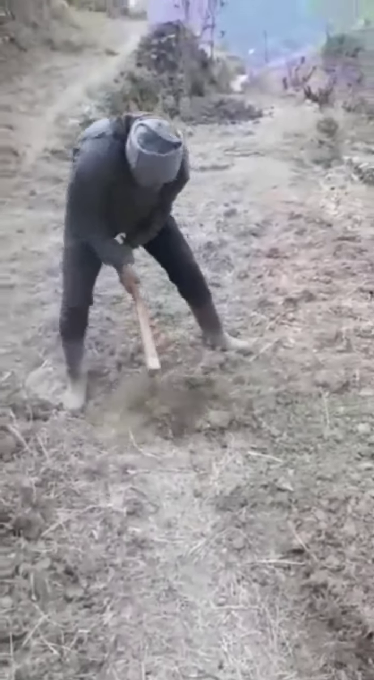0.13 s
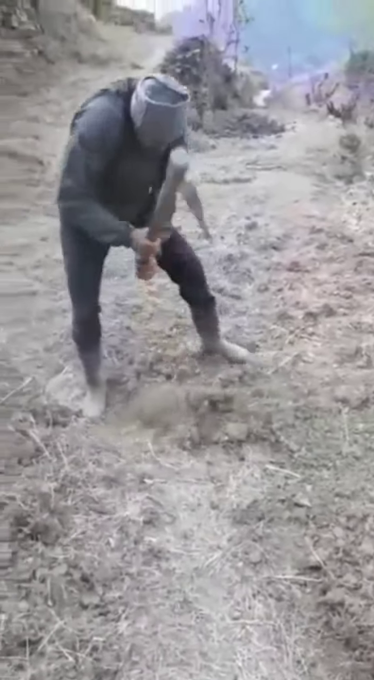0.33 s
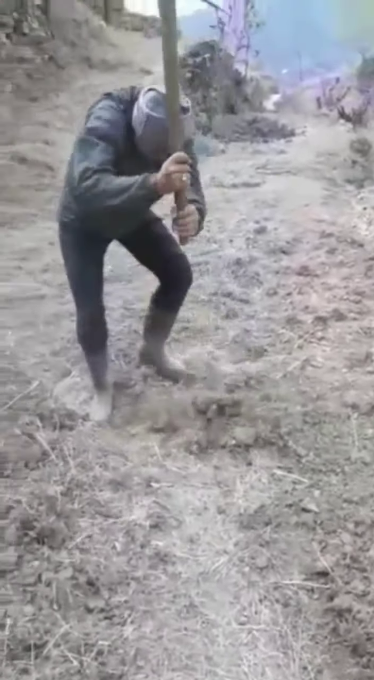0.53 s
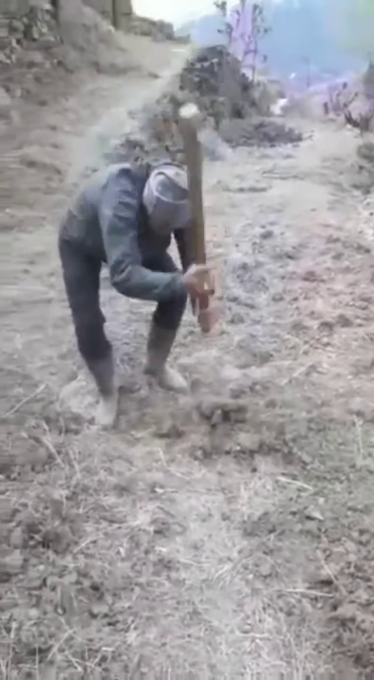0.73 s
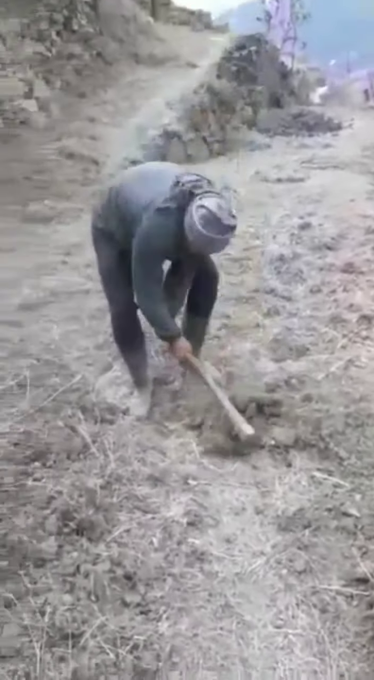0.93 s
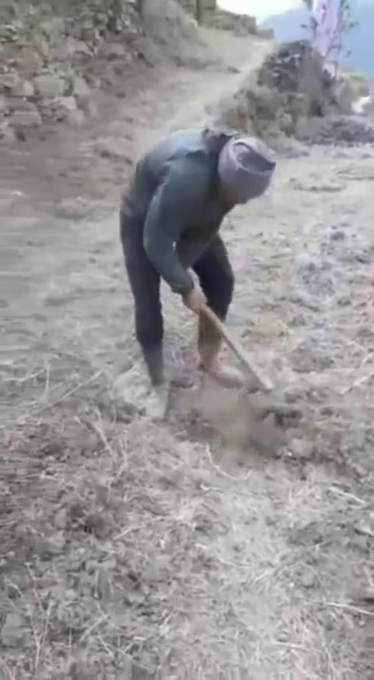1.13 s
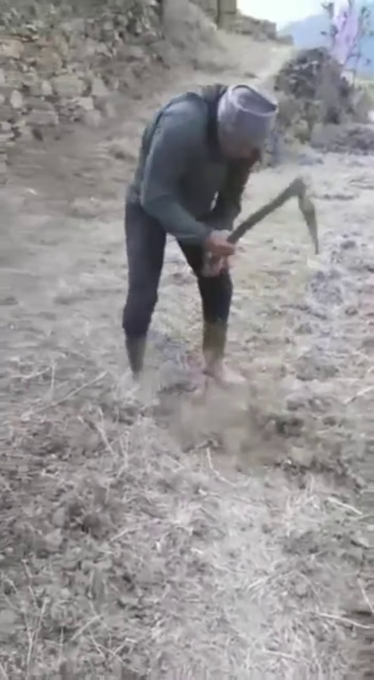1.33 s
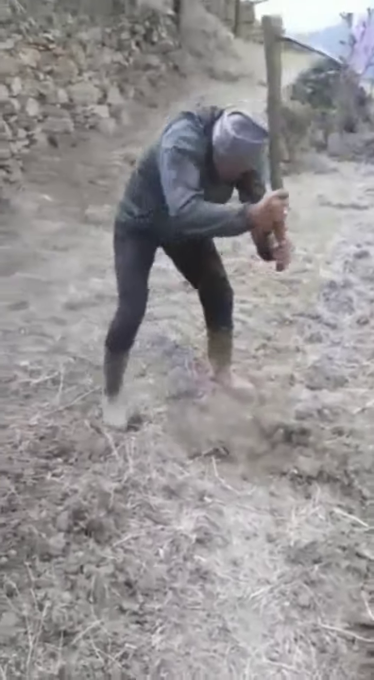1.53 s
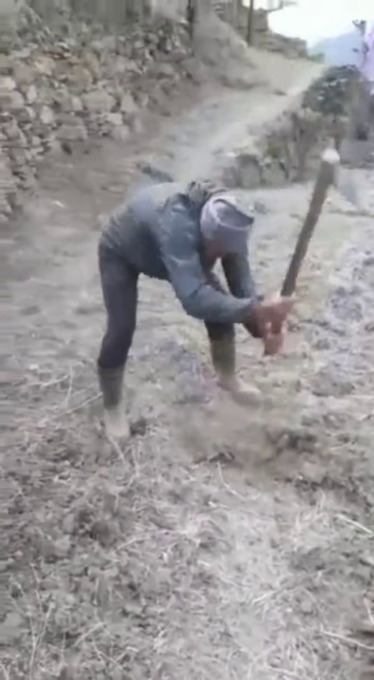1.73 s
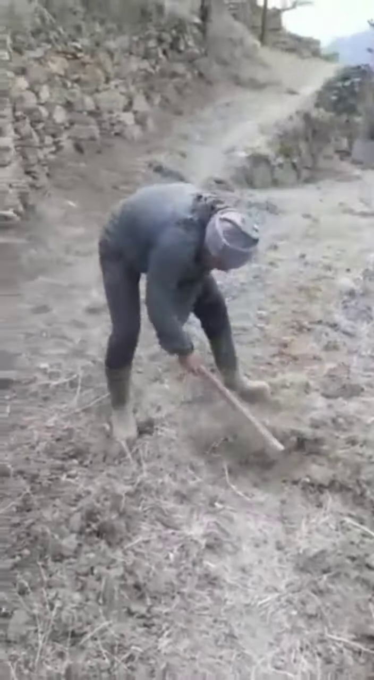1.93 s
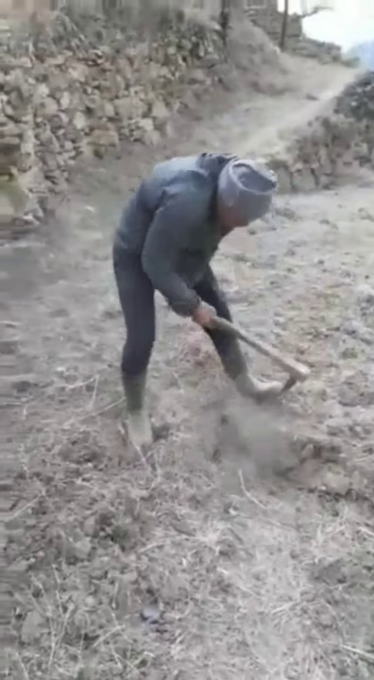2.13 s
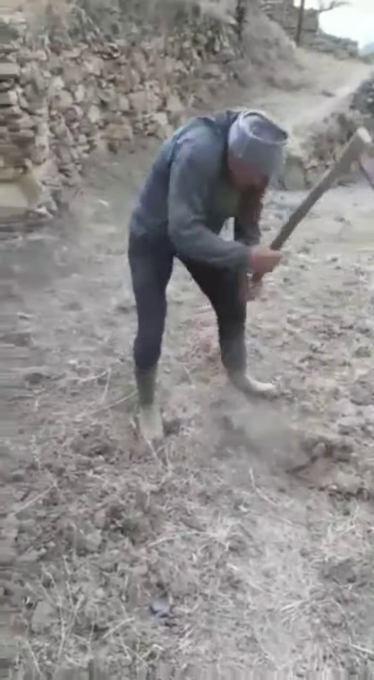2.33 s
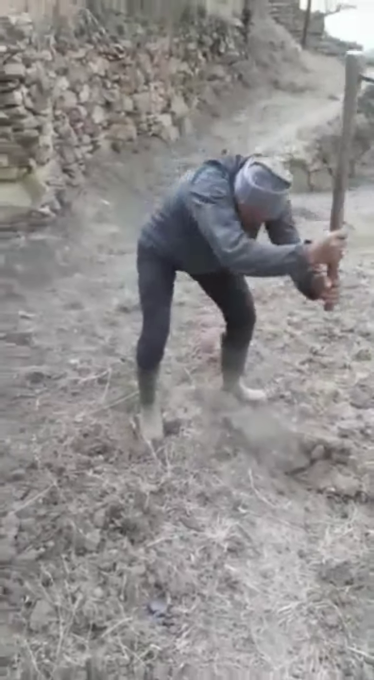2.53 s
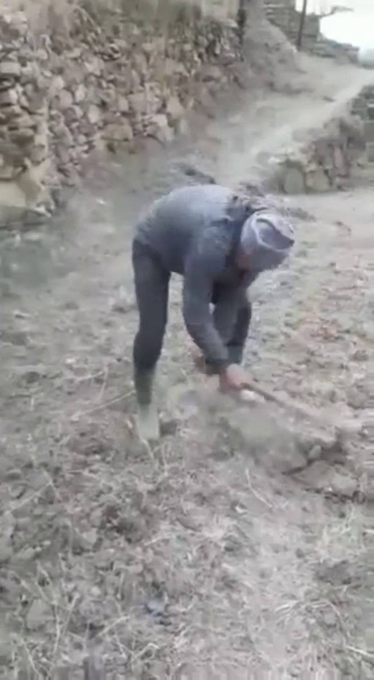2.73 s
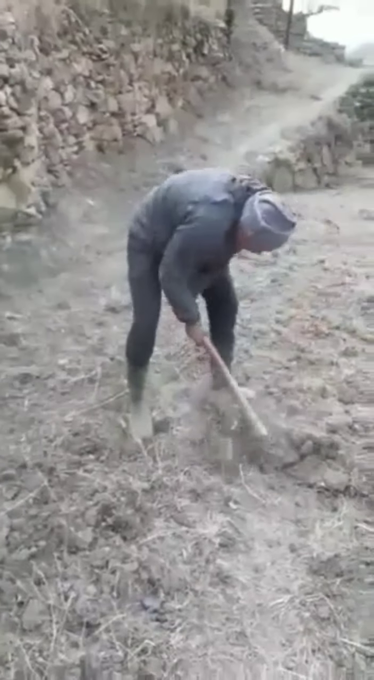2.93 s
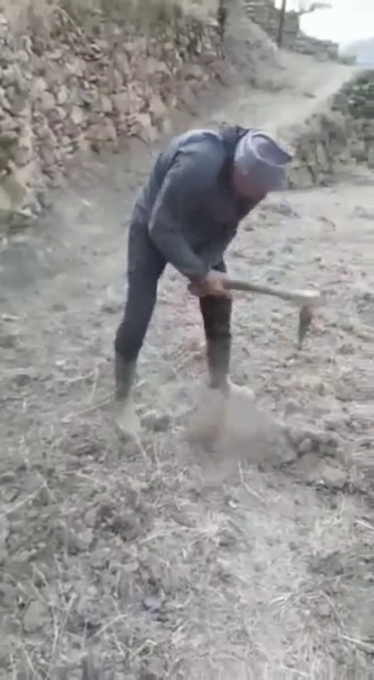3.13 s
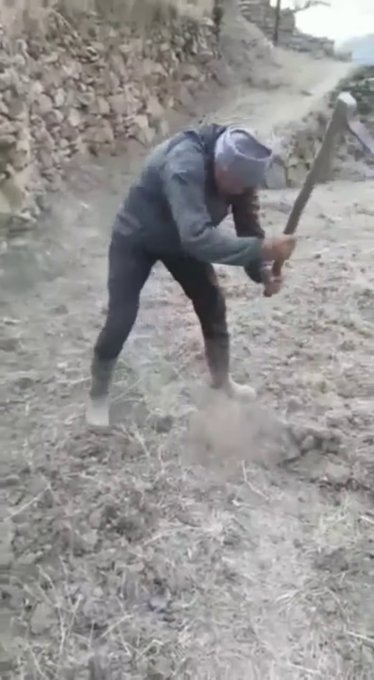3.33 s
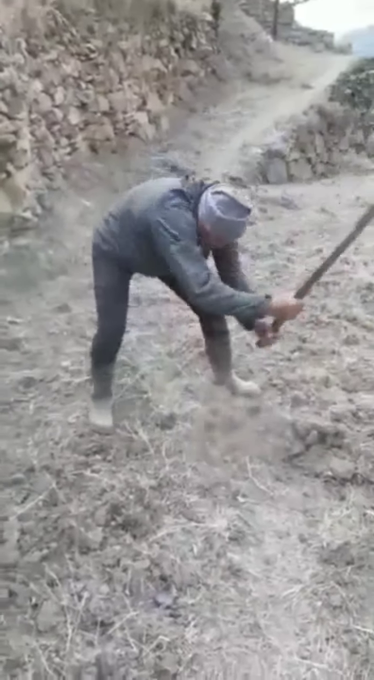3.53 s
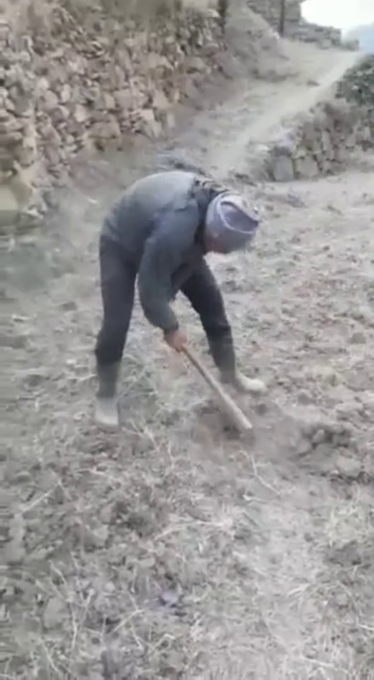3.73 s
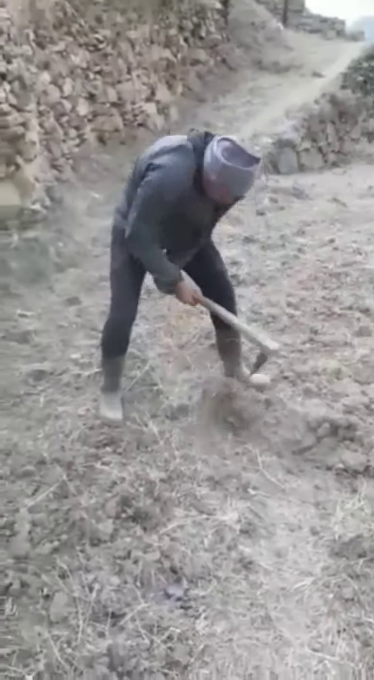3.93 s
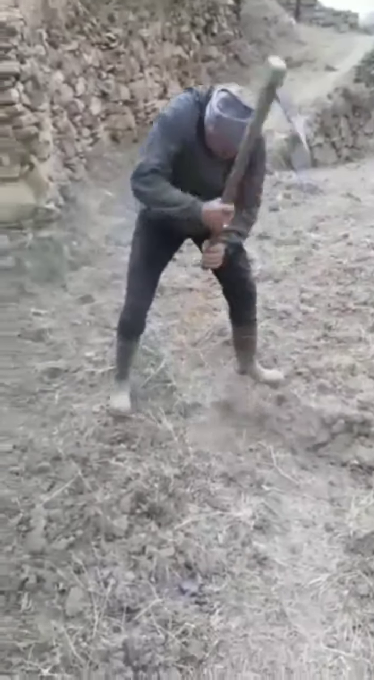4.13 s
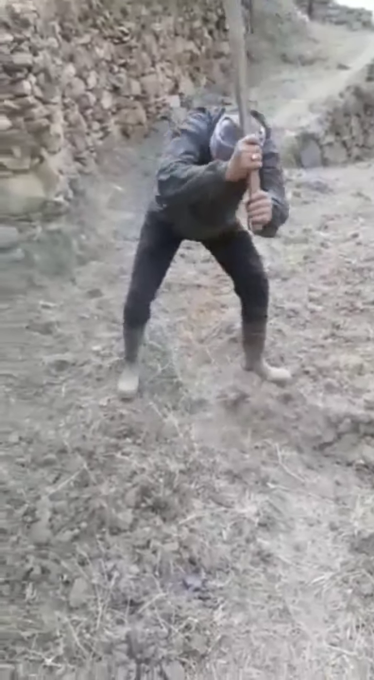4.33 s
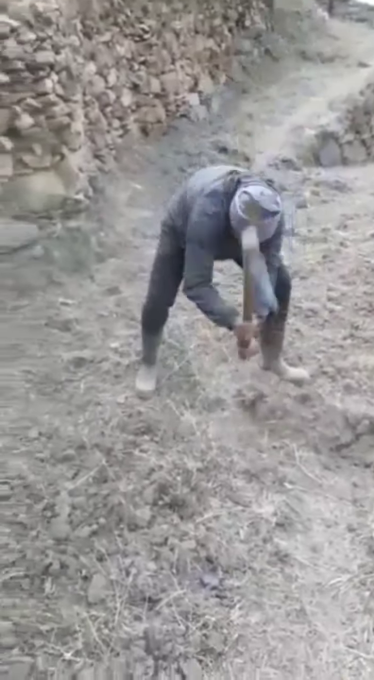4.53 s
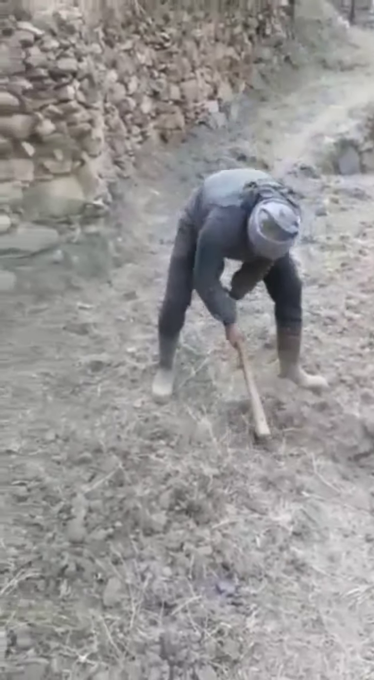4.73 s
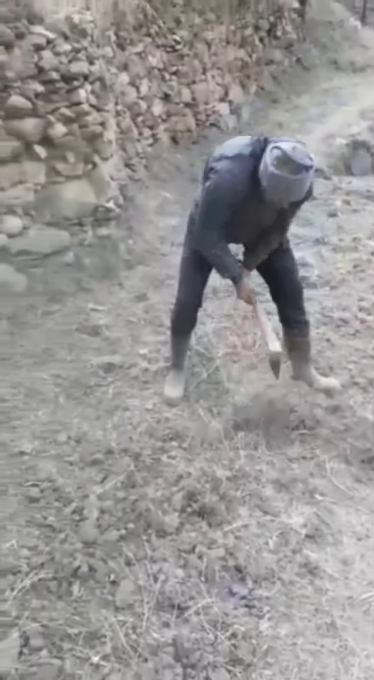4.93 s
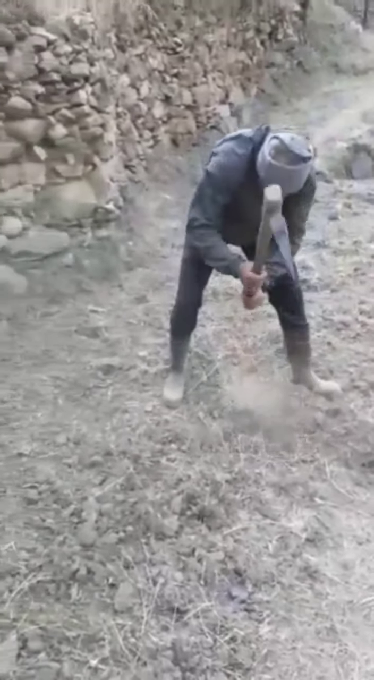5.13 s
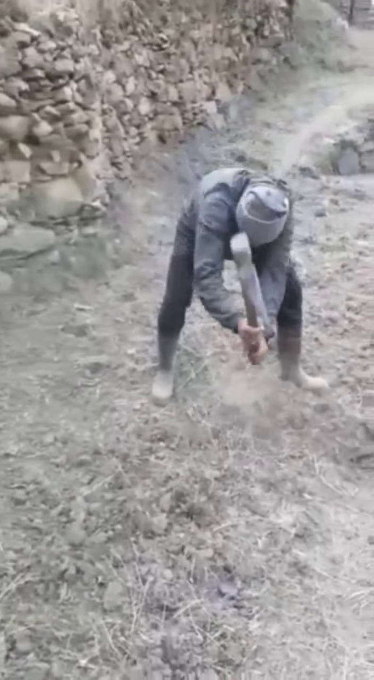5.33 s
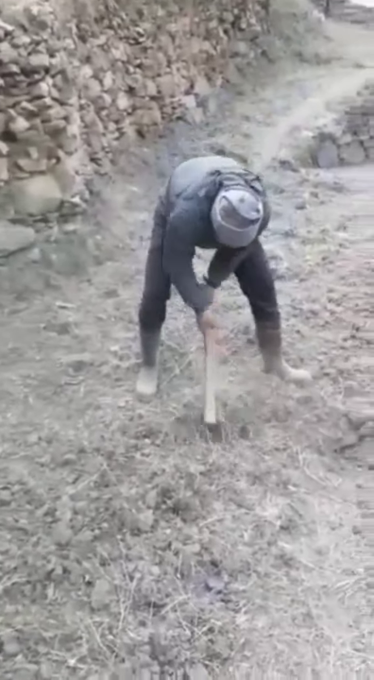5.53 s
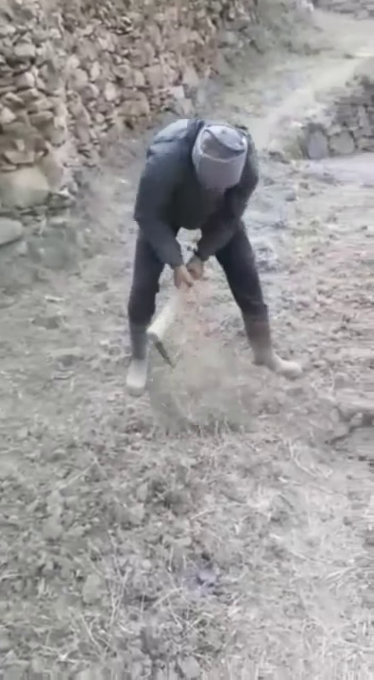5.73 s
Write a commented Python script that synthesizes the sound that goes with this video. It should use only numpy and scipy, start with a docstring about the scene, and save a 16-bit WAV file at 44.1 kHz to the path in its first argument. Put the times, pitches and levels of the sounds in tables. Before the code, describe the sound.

Light wind nudges the microphone on an open hillside, over a faint, steady distant hiss. At first, soil trickles, dry stalks rustle, boots scrape and a clod drops. At about 0.9 seconds a steel hoe swishes softly down and bites into hard dry ground: a gritty crack, a short dull ring of the blade, a knock of the wooden handle and a low thud, then thrown soil raining back. Five more blows land at about 1.9, 2.8, 3.7, 4.7 and 5.5 seconds, the later ones thudding a little less heavily. Between them, much quieter, pebbles tick, boots scuff and clods fall, with a small cluster around 4.3 seconds. Four very faint falling whistles, perhaps a far bird, come near 1.2, 2.1, 3.1 and 4.4 seconds. Loose soil is still trickling after the last blow.

```python
"""On an open hillside light wind nudges the microphone over a far hiss; soil trickles and dry stalks rustle.
Pebbles tick, boots scrape and clods drop. Then a steel hoe swishes down and, near 0.9 s, bites into hard
dry soil: fractures of crust and stones ring the blade and knock the handle, the ground thuds, and thrown
soil rains back. A faint falling whistle, perhaps a far bird, follows. Five more blows come about 0.9 s
apart, with the small sounds and three more whistles between them."""
import sys
import numpy as np
from scipy import signal
from scipy.fft import rfft, irfft, next_fast_len
from scipy.io import wavfile
from scipy.ndimage import uniform_filter1d, map_coordinates

SR = 44100
rng = np.random.default_rng(int(sys.argv[2]) if len(sys.argv) > 2 else 0)


def master_out(mix):
    """Clip the mix to full scale and print it as 16-bit PCM to the path in sys.argv[1]."""
    frames = np.transpose(np.atleast_2d(mix))
    ceiling = np.clip(frames, -1, 1)
    pcm = np.round(ceiling * 32767).astype(np.int16)
    wavfile.write(sys.argv[1], SR, pcm)


N = 255339
TIME = np.arange(N) / SR  # t/s through the scene
T = np.arange(SR // 4) / SR  # t/s within one short event


def amp(db):
    """Amplitude ratio of a level in decibels."""
    return 10 ** (np.asarray(db) / 20)


def unit(x):
    """Normalisation to an rms of 1."""
    return x / np.sqrt(np.mean(abs(x) ** 2) + 1e-20)


def spectrum(points):
    """Gain as a function of frequency, interpolated on log axes from rows of f/Hz, level/dB."""
    f, db = np.transpose(points)
    return lambda hz: amp(np.interp(np.log(hz + 1), np.log(f + 1), db))


def curves(rows):
    """Linear interpolation in time: one curve for each column after t/s."""
    times, *columns = np.transpose(rows)
    return [np.interp(TIME, times, column) for column in columns]


def filtered(x, response):
    """Linear filtering: the spectrum of x times a function of frequency."""
    size = next_fast_len(N + 8192)
    return irfft(rfft(x, size) * response(np.fft.rfftfreq(size, 1 / SR)), size)[..., :N]


def wobble(rate):
    """Slow random modulation: a spline through `rate` knots a second."""
    knots = rng.standard_normal(int(N * rate / SR) + 4)
    return map_coordinates(knots, [TIME * rate])


def add(track, s, sound):
    """Superposition of a sound on a track at s seconds."""
    part = track[round(s * SR):][:len(sound)]
    part += sound[:len(part)]


def decay(db, rise_s, t60):
    """Exponential damping after a quick onset: 60 dB lost in t60 seconds."""
    return amp(db - 60 * T / t60) * (1 - np.exp(-T / rise_s))


def rush(bands, grain_rate, grain_db, patchy_db):
    """Modulated noise of rms 1: its level flickers in grains and in patches of time and pitch."""
    grains = rng.standard_normal(N) * amp(grain_db * wobble(grain_rate))
    cells = signal.stft(grains, nperseg=512)[2]
    patches = uniform_filter1d(rng.standard_normal(cells.shape), size=8, axis=0)
    patches = uniform_filter1d(patches, size=7, axis=1)
    noise = signal.istft(cells * amp(patchy_db * unit(patches)), nperseg=512)[1][:N]
    return unit(filtered(noise, spectrum(bands)))


def wind():
    """Turbulence: lumps of wind press on the microphone as low-frequency noise."""
    # lumps of wind: t/s, level/dB, length/s
    lumps = [(0, -53, .06), (.37, -58, .1), (.496, -58, .04), (.658, -57, .07), (.744, -60, .05),
             (.95, -48, .1), (1.11, -50, .05), (1.254, -51, .05), (1.35, -60, .1), (1.452, -51, .09),
             (1.56, -57, .1), (1.642, -52, .06), (1.79, -51, .06), (1.97, -49, .1), (2.478, -64, .06),
             (2.9, -49, .08), (3.104, -64, .03), (3.164, -59, .04), (3.28, -63, .1), (3.43, -58, .15),
             (3.58, -54, .14), (3.74, -48, .1), (4.104, -59, .06), (4.234, -59, .08), (4.424, -61, .05),
             (4.68, -46, .08), (4.768, -56, .06), (4.952, -57, .12), (5.082, -57, .06), (5.222, -65, .03),
             (5.56, -50, .09), (5.79, -61, .04)]
    # pressure spectrum: f/Hz, relative level/dB
    bands = [(15, -25), (25, -1.5), (70, -1), (116, -3), (150, -6), (200, -43), (330, -120)]
    calm = amp(-74)
    pressure = calm + sum(amp(db) * np.exp(-((TIME - s) * 2 / length) ** 2) for s, db, length in lumps)
    return pressure * rush(bands, grain_rate=25, grain_db=2.5, patchy_db=0.12)


def valley_hiss():
    """Stationary broadband noise: the far hiss of the valley."""
    # hiss spectrum: f/Hz, relative level/dB
    bands = [(35, -37), (60, 4.5), (249, -8), (314, 3.5), (501, 0), (897, -3.5), (1080, -5), (1680, -7),
             (4180, -11.5), (8420, -13), (9680, -25), (14700, -14), (15800, -17)]
    return amp(-63.5) * rush(bands, grain_rate=30, grain_db=0.13, patchy_db=0.69)


def wide_hiss():
    """Opposite polarity: a faint, steady hiss, inverted between left and right, sounds wide."""
    # spectrum of the wide hiss: f/Hz, relative level/dB
    bands = [(18, -65), (30, -29), (130, -0.5), (698, -2.5), (1120, -4), (1700, -6), (3540, -7.5),
             (5990, -12.5), (8200, -33.5), (12200, -11), (15800, -13)]
    hiss = amp(-70) * rush(bands, grain_rate=30, grain_db=0.19, patchy_db=4.2)
    return np.array([hiss, -hiss])


def soil_and_stalks():
    """Granular noise: shuffling, trickling and rustling are ever finer grains; blows add to their power."""
    # loose soil: t/s, shuffling level/dB, trickling level/dB
    soil = [(0, -59.5, -57.5), (.21, -53.5, -57), (.39, -58, -59.5), (.6, -61.5, -64), (.74, -61, -62.5),
            (.98, -59, -60), (1.076, -55, -56.5), (1.3, -57, -58.5), (1.85, -58.5, -60.5), (2.05, -62, -60),
            (2.37, -61, -62), (2.72, -62, -63.5), (2.95, -57, -54), (3.32, -57.5, -55), (3.47, -54, -56),
            (3.695, -66.5, -63), (3.91, -65, -64), (4.144, -59.5, -60), (4.49, -58, -61.5),
            (4.79, -58, -60), (5.03, -62.5, -61), (5.18, -70, -64.5), (5.33, -58.5, -60), (5.6, -56, -56),
            (5.79, -64.5, -59.5)]
    # rustling dry stalks: t/s, level/dB
    stalks = [(0, -53.5), (.04, -61.5), (.17, -53.5), (.4, -55), (.52, -65), (.9, -64), (1.05, -61),
              (1.28, -55.5), (1.5, -57), (1.57, -60.5), (1.73, -59.5), (1.79, -66), (2.2, -60), (2.28, -64),
              (2.77, -68), (2.95, -57.5), (3.23, -54.5), (3.44, -55.5), (3.58, -67), (3.85, -62),
              (4.12, -59.5), (4.22, -63), (4.4, -57.5), (4.45, -63.5), (4.62, -63), (4.79, -57), (4.9, -52),
              (4.96, -55.5), (5.14, -58), (5.18, -62), (5.5, -66), (5.68, -54.5), (5.79, -53.5)]
    # air and dust rush before a blow, soil rains back after: t/s, swing level/dB, thrown level/dB
    swings = [(.92, -54, -56), (1.91, -62, -52), (2.82, -48, -48), (3.71, -70, -51), (4.66, -50, -46),
              (5.52, -62, -46)]
    # spectra of the three textures: f/Hz, relative level/dB
    shuffle_bands = [(71, -46), (120, -10), (254, -6), (343, -3.5), (480, -9.5), (529, -12), (840, -8),
                     (1200, -15.5), (1560, -70), (2640, -120)]
    trickle_bands = [(590, -38), (1000, -11.5), (1080, -6), (1620, -1.5), (1820, -2), (2100, -2.5),
                     (2510, -4.5), (3920, -9), (4600, -13.5), (5980, -41), (10100, -120)]
    rustle_bands = [(2350, -31), (4000, -18), (4860, -0.5), (5710, -2), (6950, -1), (8110, -3), (8690, 1.5),
                    (9640, -7.5), (10700, -5.5), (13800, -10), (15800, -8)]
    swing_db_per_s, thrown_t60 = 170, .55
    swing = sum((TIME < s) * amp(db - swing_db_per_s * abs(TIME - s)) for s, db, _ in swings)
    thrown = sum((TIME >= s) * amp(db - 60 * abs(TIME - s) / thrown_t60) for s, _, db in swings)
    stirred = swing * amp([[0], [0], [-10]]) + thrown * amp([[1], [0], [-1]])  # one row a texture
    shuffle, trickle, rustle = np.hypot(amp(curves(soil) + curves(stalks)), stirred)
    return (shuffle * rush(shuffle_bands, grain_rate=50, grain_db=1.9, patchy_db=2.3)
            + trickle * rush(trickle_bands, grain_rate=60, grain_db=1.3, patchy_db=2.3)
            + rustle * rush(rustle_bands, grain_rate=160, grain_db=1.3, patchy_db=2.3))


def puffs(rows, rise_s):
    """Damped band-limited noise, one puff a row."""
    out = np.zeros(N)
    for s, db, low_hz, high_hz, t60 in rows:
        band = signal.butter(3, [low_hz, high_hz], "band", fs=SR, output="sos")
        noise = signal.sosfilt(band, rng.standard_normal(len(T)))
        add(out, s, decay(db, rise_s, t60) * unit(noise))
    return out


def ticks():
    """Impulsive excitation: dropping pebbles and snapping stalks give very brief noise."""
    # ticks: t/s, level/dB, low f/Hz, high f/Hz
    impacts = [(.112, -45, 5040, 10000), (.301, -37, 800, 5300), (.3736, -40, 4280, 7260),
               (.563, -42, 600, 1500), (1.0044, -46, 5500, 8000), (1.1493, -36, 800, 2600),
               (1.216, -35, 784, 2420), (1.3224, -46, 7360, 9200), (2.11, -46, 900, 2200),
               (2.2, -46, 3500, 9000), (2.2194, -48, 5500, 8500), (2.43, -47.5, 6500, 9000),
               (3.4215, -39, 5000, 14000), (3.4355, -32, 4700, 9300), (3.4438, -39, 5500, 8500),
               (3.45, -42, 6000, 14000), (4.2133, -40, 4560, 9300), (4.4049, -37, 2500, 13000),
               (4.4414, -47, 5000, 8500), (4.5655, -38, 8040, 15000), (4.7418, -38, 2500, 11000),
               (4.825, -41, 5500, 10700), (4.85, -43, 3500, 5130), (4.905, -44, 3100, 3800),
               (4.9726, -46, 9500, 13000)]
    t60 = .015
    return puffs([(*row, t60) for row in impacts], rise_s=.00044)


def scrapes():
    """Sliding friction: boots and slipping soil give softer-edged, longer noise."""
    # scrapes: t/s, level/dB, low f/Hz, high f/Hz, t60/s
    slides = [(.225, -46, 1000, 11700, .04), (.625, -52, 2000, 13000, .1), (.652, -51, 1500, 13000, .05),
              (.755, -50, 5500, 15000, .07), (1.27, -54, 5500, 15000, .12), (1.955, -49, 800, 5500, .25),
              (2.845, -46, 1000, 4500, .15), (2.885, -43, 3100, 3500, .07), (3.428, -46, 5000, 10000, .1),
              (4.08, -52, 3500, 13000, .14), (4.316, -39, 790, 11300, .04), (4.325, -48, 1990, 12800, .2),
              (4.359, -45, 800, 8000, .035), (4.39, -54, 2500, 15000, .1), (4.8643, -41.5, 2480, 5270, .03),
              (4.88, -43.5, 880, 1180, .13), (4.89, -48, 5500, 11000, .1), (4.914, -42, 960, 1230, .05),
              (5.56, -48, 7000, 15000, .24)]
    return puffs(slides, rise_s=.003)


def clods():
    """Inelastic impact: a clod gives a few low cycles of sinking pitch and a brighter tap as it breaks."""
    # landings: t/s, relative level/dB, starting f/Hz, relative tap level/dB
    landings = [(.247, -37.5, 259, 4), (.257, -22, 299, 4.5), (.31, -39, 346, 8), (.345, -40, 186, 3),
                (.39, -33.5, 230, -1), (.561, -45, 231, 9.5), (.607, -30.5, 273, -7), (.648, -40, 167, 1),
                (1.608, -32, 284, -14), (1.622, -33, 246, -3), (2.447, -40.5, 270, -3),
                (3.324, -31, 286, -5.5), (3.625, -37, 128, 0), (4.32, -35.5, 281, 6),
                (4.358, -33.5, 378, 1), (4.399, -36.5, 356, 2)]
    periods_to_die, tap_hz = 9, 850
    out = np.zeros(N)
    for s, db, hz, tap_db in landings:
        low = amp(-60 * T * hz / periods_to_die) * np.sin(2 * np.pi * hz * T * np.exp(-T / 0.128))
        tap = amp(tap_db + 4 - 60 * T / 0.008) * np.sin(2 * np.pi * tap_hz * T)
        onset = 1 - np.exp(-T / 0.0023)
        add(out, s, amp(db + 3.5) * onset * (low + tap))
    return out * amp(2 * wobble(200))


def swish():
    """Flow noise round the hoe's head climbs and swells with its speed, then dies as the head stops."""
    # strokes: loudest t/s, swell/s, top f/Hz, level/dB
    strokes = [(.94, .2, 2000, -49), (2.865, .18, 1940, -43), (4.67, .16, 1990, -43.5),
               (5.52, .35, 2120, -56.5)]
    fade_s, climb_hz_per_s, depth_db = .06, 700, 24
    out = np.zeros(N)
    for s, swell, top_hz, db in strokes:
        t = np.arange(-swell, fade_s, 1 / SR)
        envelope = amp(db - depth_db * np.where(t < 0, -t / swell, (t / fade_s) ** 2))
        hz = top_hz + climb_hz_per_s * np.minimum(t, 0)
        add(out, s - swell, envelope * np.sin(2 * np.pi * np.cumsum(hz) / SR))
    return out * wobble(160)  # widens the tone into a narrow band of noise


def ringing(force, modes):
    """Modal superposition: resonances of alternating sign, scaled so that white noise keeps its level."""
    def response(f):
        return unit(sum((-1) ** k * amp(db) * 1j * f * width / (hz * hz - f * f + 1j * f * width)
                        for k, (hz, width, db) in enumerate(modes)))
    return filtered(force, response)


def hoe_bites():
    """Forced vibration: bursts of uneven small fractures shake blade and handle and spray grit."""
    # blows: entry t/s, grinding level/dB, grinding t60/s, crumbling t/s, level/dB, grit over blade/dB
    blows = [(.916, -33, .12, .936, -31.5, -9), (1.909, -34, .05, 1.921, -29, -12),
             (2.813, -29.5, .064, 2.8295, -33.5, -8), (3.7025, -33, .09, 3.7172, -34, -5),
             (4.6532, -32.5, .055, 4.668, -37, 2), (5.513, -39, .15, 5.549, -34.5, -2)]
    # sharp cracks of crust and stones: t/s, blade level/dB, handle level/dB
    cracks = [(.9236, -27, -35), (.926, -16.5, -24.5), (.9293, -27, -30), (1.9118, -18.5, -21),
              (1.9146, -15, -28), (1.974, -41, -55), (2.822, -34, -25.5), (2.8245, -21, -36),
              (3.7045, -36, -36), (3.7095, -39, -27), (3.7185, -34, -32), (4.6597, -29, -29.5),
              (5.523, -38, -30), (5.527, -29, -27), (5.5408, -19, -28), (5.5443, -33, -37)]
    # modes of the soil-damped steel blade and the wooden handle: f/Hz, width/Hz, relative level/dB
    blade_modes = [(1634, 680, 3), (2020, 145, 8), (2250, 600, 1), (2990, 600, 4), (3227, 350, 8),
                   (4030, 580, 0), (4360, 106, 6.5), (4980, 490, 2), (5410, 230, 2)]
    handle_modes = [(725, 200, -3), (1103, 94, -0.5)]
    # spectrum of shattering crust: f/Hz, relative level/dB
    grit_bands = [(2940, -36), (5000, -9), (5480, -1.5), (7070, 2), (8330, 1.5), (9350, -6.5),
                  (10700, -6.5), (15800, -14.5)]
    envelopes = np.zeros((3, N))  # blade, handle, grit

    def burst(s, levels_db, rise_s, t60):
        for track, db in zip(envelopes, levels_db):
            add(track, s, decay(db, rise_s, t60))

    for entry_s, grind_db, grind_t60, crumble_s, crumble_db, grit_db in blows:
        burst(entry_s, [grind_db, grind_db - 1, grind_db + grit_db], rise_s=.002, t60=grind_t60)
        burst(crumble_s, [crumble_db, crumble_db - 6, crumble_db + grit_db], rise_s=.0024, t60=.11)
    for s, blade_db, handle_db in cracks:
        grit_db = [db for entry_s, *_, db in blows if entry_s < s][-1]  # of the blow under way
        burst(s, [blade_db, handle_db, blade_db + grit_db - 4], rise_s=.0006, t60=.028)
    on_blade, on_handle, spray = envelopes * rng.standard_normal((3, N)) * amp(1.17 * wobble(500))
    grit = filtered(spray, lambda hz: unit(spectrum(grit_bands)(hz)))
    return ringing(on_blade, blade_modes) + ringing(on_handle, handle_modes) + grit


def ground_thuds():
    """Impulse response: after a jolt, packed soil knocks; deeper layers answer lower, later and longer."""
    # the blade stops dead: t/s, jolt level/dB, then relative level/dB, f/Hz for knock, body and boom
    thuds = [(.9285, -12, -19, 400, -19, 196, -26, 107),
             (1.9135, -14.5, -20.5, 326, -20, 169, -19.5, 110.4),
             (2.8275, -15, -20, 306, -21.5, 189, -27, 84), (3.7203, -17, -26, 279, -31.5, 158, -33, 99),
             (4.6615, -21.5, -29.5, 385, -23.5, 241, -29.5, 153.4),
             (5.5445, -22, -21.5, 367, -27, 227, -29, 112)]

    def mode(db, hz, rise_s, t60):
        return decay(db, rise_s, t60) * np.sin(2 * np.pi * (hz * T + rng.random()))

    jolts, layers = np.zeros((2, N))
    for s, jolt_db, knock_db, knock_hz, body_db, body_hz, boom_db, boom_hz in thuds:
        u = (T - .005) / 0.00053  # time from the jolt's centre, in pulse widths
        add(jolts, s - .005, -amp(jolt_db) * (1 - u * u) * np.exp(-u * u / 2))
        knock = mode(knock_db + 1.5, knock_hz, rise_s=0.0011, t60=0.051)
        body = mode(body_db - 1.5, body_hz, rise_s=0.003, t60=0.087)
        boom = mode(boom_db + 5, boom_hz, rise_s=0.026, t60=0.1)
        add(layers, s - .003, knock + body + boom)
    return jolts + layers * amp(2.5 * wobble(130))


def whistles():
    """Frequency glide: thin fluttering tones slide down from their top pitch as they swell and fade."""
    # whistles: t/s, length/s, top f/Hz, last f/Hz, share of the length before the top, level/dB
    calls = [(1.175, .035, 4340, 3500, 0, -60), (2.07, .32, 3420, 2430, 0, -63),
             (3.085, .155, 4200, 2930, .17, -55.5), (4.42, .09, 3480, 2200, .1, -58.5)]
    out = np.zeros(N)
    for s, length, top_hz, last_hz, top_at, db in calls:
        progress = np.arange(round(length * SR)) / (length * SR)
        hz = top_hz + (last_hz - top_hz) * abs(progress - top_at) / (1 - top_at)
        envelope = amp(db) * np.sin(np.pi * progress ** .65)
        add(out, s, envelope * np.sin(2 * np.pi * np.cumsum(hz) / SR))
    return out * amp(2 * wobble(60))


def ground_echo(x):
    """Destructive interference with the echo off the ground, as one notch in the spectrum."""
    hz, width_hz, depth = 530, 220, 0.93
    return filtered(x, lambda f: 1 - depth * 1j * f * width_hz / (hz ** 2 - f * f + 1j * f * width_hz))


def spread(x):
    """A faint, short left-right smear, mostly in the treble, trails the events in opposite polarity on the two
    sides."""
    side_bands = [(100, -64), (500, -43.5), (3000, -59), (9000, -13.5)]  # f/Hz, level/dB
    tail = rng.standard_normal(SR // 10) * amp(-60 * T[:SR // 10] / 0.027)
    smear = signal.fftconvolve(x, tail / np.linalg.norm(tail))[:N]
    side = filtered(smear, spectrum(side_bands))
    return np.array([x + side, x - side])


def scene():
    """Superposition in stereo: blows and small events over the noise of the hillside."""
    impacts = ground_echo(hoe_bites() + ground_thuds() + clods())
    small = ticks() + scrapes()
    hiss = wide_hiss()
    events = spread(impacts + small + whistles() + swish())
    return events + wind() + soil_and_stalks() + valley_hiss() + hiss


def record(dry):
    """Band limiting: deepest bass and top treble are lost; the converter sits slightly off zero."""
    bass_hz, top_hz, offset = 40, 15830, -.0009
    return filtered(dry, lambda hz: (hz < top_hz) * (1j * hz / (bass_hz + 1j * hz)) ** 2) + offset


dry = scene()
out = record(dry)
master_out(out)
```